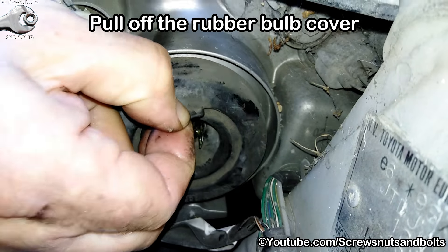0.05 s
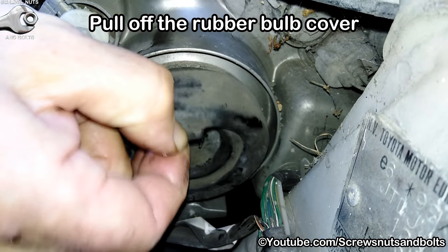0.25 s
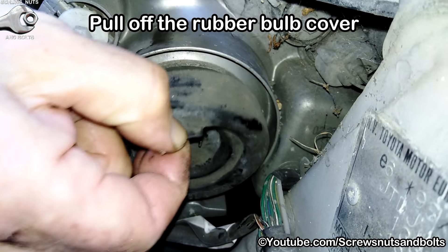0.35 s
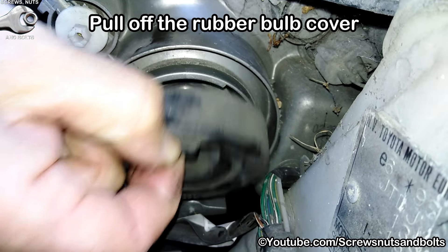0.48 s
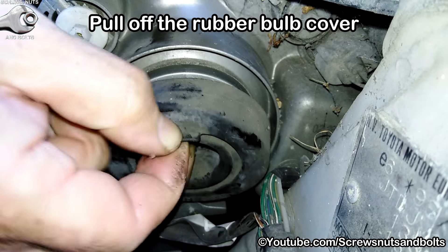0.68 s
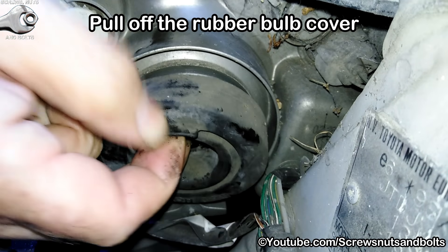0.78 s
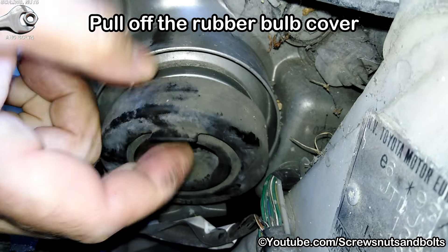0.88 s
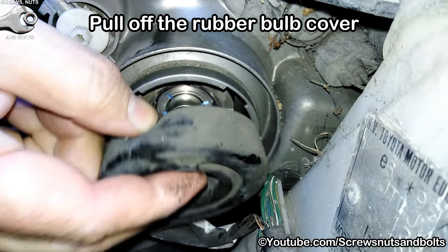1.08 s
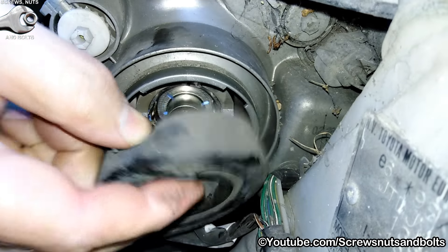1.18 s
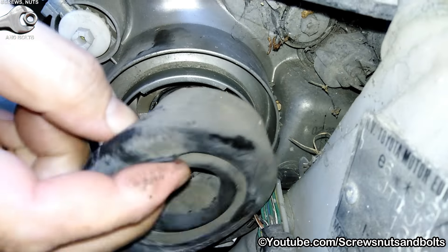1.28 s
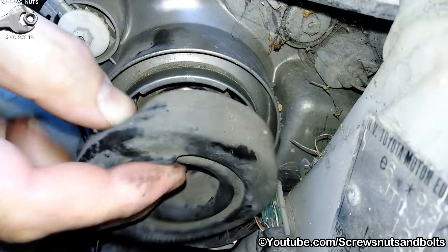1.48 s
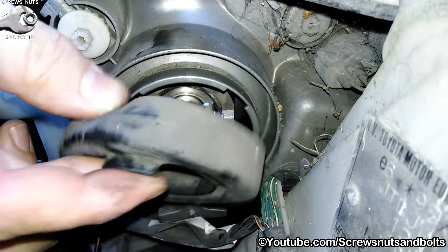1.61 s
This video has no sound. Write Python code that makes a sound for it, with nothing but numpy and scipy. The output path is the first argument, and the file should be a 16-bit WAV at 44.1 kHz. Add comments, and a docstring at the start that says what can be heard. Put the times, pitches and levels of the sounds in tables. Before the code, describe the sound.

Rubber cover worked off a plastic lamp housing by hand, with squeaky-dry scuffs, clicks and thumps

```python
"""Rubber cover on a lamp housing

Fingers work a rubber dust cover off a plastic lamp housing in an engine bay, close to the microphones.
Rubber slips over plastic in dense tiny jerks (filtered clicks), and scuffs ring the housing.
The rim ticks on the housing (noise cracks and ringing knocks); the cover flexes with rumble and dull thumps.
The work lies to the right; the bay adds a short echo, over a faint background of filtered noise."""
import sys
import numpy as np
from scipy import signal
from scipy.fft import rfft, irfft
from scipy.io import wavfile
from scipy.ndimage import uniform_filter1d

SR = 44100
rng = np.random.default_rng(int(sys.argv[2]) if len(sys.argv) > 2 else 0)


def voltage_ratio(level):
    """Linear amplitude factor for a level in decibels (scalar or array-like)."""
    return 10 ** (np.asarray(level, float) / 20)


def master(y):
    """Save y as 16-bit WAV."""
    cut = np.clip(np.atleast_2d(y).T, -1, 1)
    pcm = np.round(cut * 32767)  # scale
    wavfile.write(sys.argv[1], SR, pcm.astype(np.int16))


N = 72765  # samples, 1.65 s

# tone colour of rubber slipping on plastic: (frequency [Hz], relative level [dB])
SLIP_COLOUR = [(200, 1), (700, -2.5), (1500, 1), (3000, -6.5), (5000, -3.5), (8000, -6.5), (11500, -8),
               (14200, -18.5), (14700, -51)]
# ringing tones (modes) of the rubber cover: (frequency [Hz], relative level [dB], time to fade by 60 dB [s])
COVER_MODES = [(100, -1, .15), (130, -5, .1), (165, -6, .1), (195, -8, .1), (228, -4, .18)]


def rubbing():
    """Rubber on plastic is heard three ways: hissing slips, ringing scuffs and a rumbling cover."""
    # the rubbing strokes: (time [s], treble level [dB], middle level [dB])
    strokes = [(0, -100, -78), (.12, -96, -94), (.18, -74, -78), (0.214, -67, -59.5), (0.22, -51, -58),
               (0.251, -54.5, -43), (0.277, -49.5, -50.5), (0.314, -53, -53), (0.336, -74.5, -73),
               (0.379, -78.5, -69.5), (0.386, -52.5, -53), (.42, -62, -62), (.455, -56, -55),
               (0.474, -53, -67), (0.503, -44.5, -38), (.535, -51.5, -53), (.574, -67, -61),
               (0.618, -54, -62), (0.641, -63.5, -61.5), (0.664, -42, -41.5), (0.695, -62, -59),
               (0.824, -67, -65.5), (0.869, -71.5, -72.5), (0.918, -63, -62), (0.929, -50.5, -54),
               (0.953, -55.5, -65), (0.972, -67.5, -64), (0.996, -49.5, -57), (1.047, -57.5, -65),
               (1.059, -48.5, -65.5), (1.081, -65, -71), (1.133, -76.5, -68.5), (1.177, -74.5, -73.5),
               (1.201, -51, -54), (1.241, -45.5, -80), (1.264, -45, -64), (1.273, -60, -61),
               (1.288, -44.5, -53), (1.299, -65.5, -56), (1.36, -72.5, -76), (1.398, -84, -75.5),
               (1.437, -71.5, -86), (1.458, -60, -66), (1.52, -64.5, -71.5), (1.533, -52.5, -58.5),
               (1.55, -66.5, -71), (1.625, -70, -68), (1.65, -78, -76)]
    s, treble, middle = np.transpose(strokes)
    return slips(s, treble, middle) + scuffs(s, middle) + cover_rumble()


def slips(s, treble, middle):
    """Rubber sticks and slips in dense tiny jerks; the hiss brightens when light and fast."""
    slips_per_s, spread_db = 5900, 2
    split_hz, brighten = 4500, .4  # tilt in dB for each dB that the treble leads the middle
    hiss = evened(colour(jerks(slips_per_s, spread_db), SLIP_COLOUR))
    low = signal.lfilter(*signal.butter(1, split_hz, fs=SR), hiss)
    high = hiss - low
    # half of the tilt lifts the top, the other half lowers the bottom
    tilt_db = brighten * track(s, treble - middle) / 2
    return voltage_ratio(track(s, treble)) * (voltage_ratio(tilt_db) * high + voltage_ratio(-tilt_db) * low)


def scuffs(s, middle):
    """Coarser jerks shake the plastic housing, which rings mostly around one pitch."""
    scuff_hz, scuffs_per_s, spread_db = 450, 700, 2.5
    return voltage_ratio(track(s, middle)) * shaken(leaning(scuff_hz), scuffs_per_s, spread_db)


def cover_rumble():
    """The bending cover is shaken by many small flexes, and its low modes rumble."""
    # strength of the bending: (time [s], level [dB])
    bending = [(0, -86), (0.029, -72), (0.078, -98), (0.179, -70), (0.255, -42.5), (0.349, -74),
               (.4, -61.5), (.44, -63), (0.473, -48), (.5, -48), (.56, -56), (.61, -60), (.66, -55),
               (.73, -60.5), (.86, -70), (0.898, -53), (.988, -67), (1.06, -54.5), (1.134, -72),
               (1.201, -53.5), (1.283, -49), (1.37, -74.5), (1.534, -86), (1.65, -97)]
    flexes_per_s, spread_db = 900, 1.5
    return voltage_ratio(track(*np.transpose(bending))) * shaken(COVER_MODES, flexes_per_s, spread_db)


def jerks(per_s, spread_db):
    """Random clicks of either sign, a few large, with a strength that comes in clumps."""
    clump_db, clump_s = 1.5, 0.0052
    clump = evened(uniform_filter1d(rng.standard_normal(N), round(clump_s * SR)))
    surprise = np.minimum(rng.exponential(1, N), 5)
    size = voltage_ratio(spread_db * surprise + clump_db * clump)
    happens = rng.random(N) < per_s / SR
    return size * np.sign(rng.standard_normal(N)) * happens


def shaken(modes, per_s, spread_db):
    """Jerks at six spots each ring the modes in their own mix; rubbing hands shorten the ring."""
    held = np.array(modes) * [1, 1, .45]  # share of the fading time that is left
    total = np.zeros(N)
    for _ in range(6):
        blows = jerks(per_s / 6, spread_db)
        total += signal.oaconvolve(blows, ring(held, detune=.08))[:N]
    return evened(total)


def ring(modes, detune, neighbour=-1):
    """One blow on a set of modes: fading sines, each a little detuned and unevenly struck."""
    t = np.arange(SR // 5)[:, None] / SR
    hz, db, t60 = np.transpose(modes)
    uneven_db = 1.5 * rng.standard_normal(len(hz))
    shift = detune * rng.standard_normal(len(hz))
    # each mode's swing is multiplied by one more "neighbour": -1 makes neighbours swing opposite ways
    swing = neighbour ** np.arange(len(hz))
    fade = voltage_ratio(db + uneven_db - 60 * t / t60)
    return (swing * fade * np.sin(2 * np.pi * hz * (1 + shift) * t)).sum(axis=1)


def leaning(centre_hz):
    """A blow favours the housing modes near its centre; others weaken with distance in octaves."""
    # ringing tones of the housing: (frequency [Hz], relative level [dB], time to fade by 60 dB [s])
    housing = [(447, -3, .04), (600, -8, .045), (648, -2, .055), (832, -2, .05), (1040, -6, .04),
               (1200, -5, .03), (1600, -11, .03), (2115, -2, .022), (2500, -9, .025), (3100, -13, .04),
               (3940, -7, .017)]
    slope_db = 4  # lost for each octave away
    return [(f, d - slope_db * abs(np.log2(f / centre_hz)), t60) for f, d, t60 in housing]


def ticks(mix):
    """The rim strikes the housing at listed times."""
    # the ticks: (time [s], crack level [dB], crack centre [Hz], knock level against the crack [dB],
    # knock centre [Hz], time for the crack to fade by 60 dB, at least 0.004 in use [s])
    tick_list = [(0.127, -46.5, 3630, -11.5, 2800, 0.01), (0.16, -59.5, 3800, -9, 2140, 0.017),
                 (.1912, -39, 4000, 8.5, 1500, 0.01), (.2240, -48, 4000, 9, 1800, 0.018),
                 (.2603, -50, 2000, 14, 600, .008), (.3150, -46, 3450, 8, 700, 0.013),
                 (0.2748, -36.5, 12200, 0, 925, 0.01), (.3850, -44.5, 3680, 4.5, 560, 0.051),
                 (0.435, -47.5, 11900, -2, 910, 0.021), (0.4623, -36, 11800, 0, 1030, 0.06),
                 (0.4934, -33.5, 4300, 2.5, 610, 0.0034), (0.526, -43.5, 8450, 0.5, 1050, 0.01),
                 (.6568, -36, 8300, 6, 850, 0.01), (.6625, -49, 2300, 12, 1300, 0.03),
                 (.7400, -48, 3500, 0, 2100, .018), (0.887, -56.5, 4160, 11, 750, 0.015),
                 (1.2792, -38, 4030, -2, 500, .018), (1.6355, -40.5, 3730, -33, 2530, 0.0076)]
    for s, db, hz, knock_db, knock_hz, t60 in tick_list:
        add(mix, s, tick(db, hz, knock_db, knock_hz, t60))


def tick(db, hz, knock_db, knock_hz, t60):
    """A sharp contact cracks as noise, and a blow with a short chatter rings the housing."""
    n = 4096
    t = np.arange(n) / SR
    noise = rng.standard_normal(n)

    # crack: a broad hiss plus a band around the centre
    width = .45  # natural log of the upper band edge over the lower
    lo, hi = np.clip(hz * np.exp(np.array([-1, 1]) * width / 2), 500, 16000)
    high_pass = signal.butter(2, hz / 3, "high", fs=SR, output="sos")
    band_pass = signal.butter(2, [lo, hi], "band", fs=SR, output="sos")
    wide = signal.sosfilt(high_pass, colour(noise, SLIP_COLOUR))
    narrow = signal.sosfilt(band_pass, noise)
    rise = np.minimum(t / 0.000098, 1)
    fade = voltage_ratio(-60 * t / max(t60, .004))
    crack = (evened(wide) + evened(narrow)) * rise * fade / 2

    # knock: one firm contact, then weaker random ones that die away
    first_hit, chatter_per_s, chatter_fade_s = 4, 700, .0035
    chatter = rng.standard_normal(n) * (rng.random(n) < chatter_per_s / SR)
    blows = first_hit * (t == 0) + chatter * np.exp(-t / chatter_fade_s)
    knock = signal.oaconvolve(blows, ring(leaning(knock_hz), detune=.01))
    knock = knock / abs(knock).max()

    crack = np.pad(crack, (0, len(knock) - n))
    return voltage_ratio(db) * (crack + voltage_ratio(knock_db) * knock)


def thumps(mix):
    """The cover gives dull thumps at listed times."""
    # the thumps: (time [s], peak level before the bay and microphone gain [dB], push length [s])
    thump_list = [(0.381, -40.5, 0.0078), (.4950, -23, 0.002), (0.5060, -31, 0.0015),
                  (0.5250, -25.5, 0.0033), (0.642, -33.5, 0.0024), (0.889, -48.5, 0.006),
                  (1.181, -41, 0.004), (1.282, -62, 0.006)]
    for s, db, length in thump_list:
        add(mix, s, thump(db, length))


def thump(db, length):
    """A soft push sets the cover's modes swinging."""
    push = np.sin(np.pi * np.arange(0, 1, 1 / (max(length, .001) * SR))) ** 2
    swing = np.convolve(push, ring(COVER_MODES, detune=0.011, neighbour=0.87))
    return voltage_ratio(db) * swing / abs(swing).max()


def bay(x):
    """Sound comes later and duller on the left; short echoes crossfade steadily among eight random patterns."""
    # left level against right: (frequency [Hz], level [dB])
    left_colour = [(60, -8), (130, -6.5), (290, -6), (640, -9), (1410, -13), (3100, -16), (6820, -20),
                   (11000, -26), (15000, -20)]
    # echo against direct sound on the left, before the left colour: (frequency [Hz], level [dB])
    echo_colour = [(100, -12), (300, -9), (700, -2), (2000, 8), (8000, 10), (14000, 8)]
    echo_t60, step_s, right_echo_db = .022, .04, -13
    lag_s, mic_db = 0.0003, 4.5

    # eight echo patterns for each side, made of fading noise
    t = np.arange(SR // 16) / SR
    tails = rng.standard_normal((8, 2, len(t))) * voltage_ratio(-60 * t / echo_t60)
    tails = tails / np.linalg.norm(tails, axis=2, keepdims=True)

    # the sound crossfades from one pattern to the next, round and round
    place = (np.arange(N) / SR / step_s - np.arange(8)[:, None]) % 8
    share = np.sin(np.pi * place / 2) ** 2 * (place < 2)
    echoes = signal.oaconvolve((x * share)[:, None], tails, axes=2)
    echo = colour(echoes.sum(axis=0)[:, :N], echo_colour)

    left = colour(np.roll(x, round(lag_s * SR)) + echo[0], left_colour)
    right = x + voltage_ratio(right_echo_db) * echo[1]
    return voltage_ratio(mic_db) * np.array([left, right])


def air():
    """Faint background of filtered noise, partly shared by both channels."""
    # colour of the background: (frequency [Hz], relative level [dB])
    air_colour = [(30, 2.5), (87, 18.5), (296, -30), (662, -15), (1090, -15), (1650, -29), (14200, -32.5),
                  (14600, -61)]
    level_db = -69
    left, right, shared = colour(rng.standard_normal((3, N)), air_colour)
    return voltage_ratio(level_db) * evened(np.array([left + shared, right + 0.5 * shared]))


def evened(x):
    """Scale to an rms (average strength) of 1."""
    return x / np.sqrt(np.mean(x ** 2) + 1e-20)


def add(mix, s, sound):
    """Mix a sound in at a time in seconds."""
    part = mix[round(s * SR):][:len(sound)]
    part += sound[:len(part)]


def colour(x, points):
    """Filter by a (frequency [Hz], level [dB]) table."""
    hz, db = np.transpose(points)
    f = np.fft.rfftfreq(x.shape[-1], 1 / SR)
    gain = voltage_ratio(np.interp(np.log(f + 1), np.log(hz + 1), db))
    return irfft(rfft(x) * gain, x.shape[-1])


def track(s, db):
    """A dB curve at every sample."""
    return np.interp(np.arange(N) / SR, s, db)


def scene():
    """The handwork in the bay over the background."""
    work = rubbing()
    ticks(work)
    thumps(work)
    return bay(work) + air()


def top_cut(x):
    """Nothing passes above the cut-off."""
    return signal.sosfilt(signal.butter(12, 15610, fs=SR, output="sos"), x)


def record(dry):
    """The microphones cut the bass."""
    low_cut_hz = 82.4
    bass_cut = signal.butter(4, low_cut_hz, "high", fs=SR, output="sos")
    mix = signal.sosfilt(bass_cut, dry)
    return top_cut(mix)


dry = scene()
out = record(dry)
master(out)
```